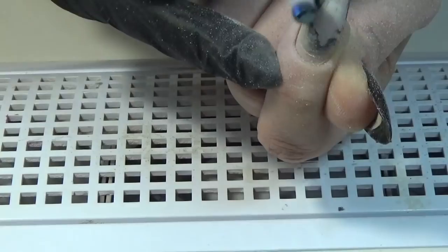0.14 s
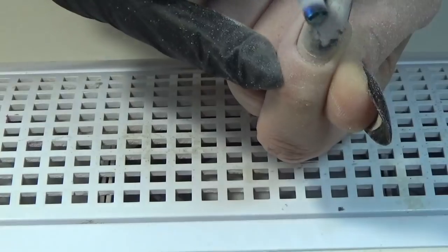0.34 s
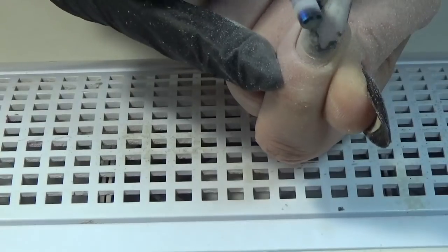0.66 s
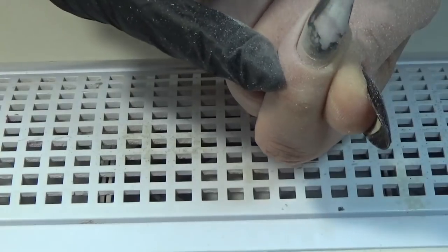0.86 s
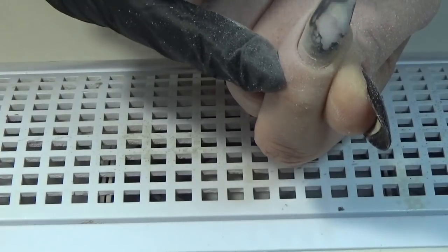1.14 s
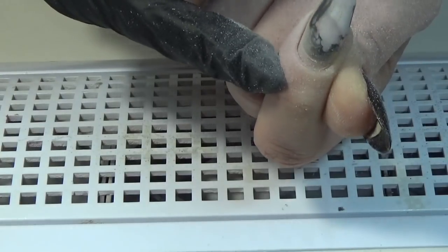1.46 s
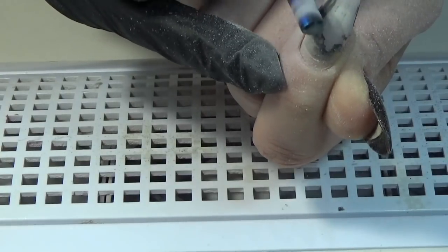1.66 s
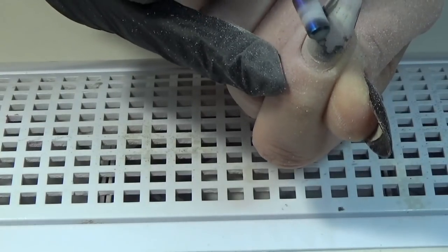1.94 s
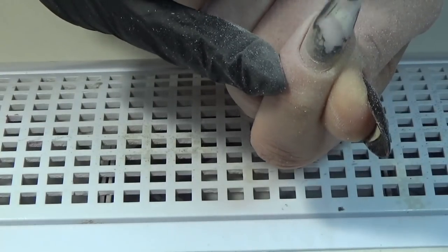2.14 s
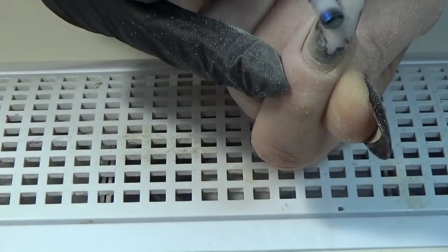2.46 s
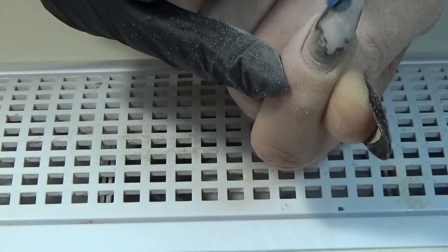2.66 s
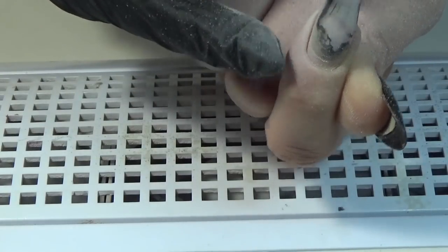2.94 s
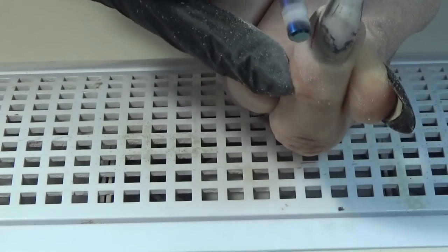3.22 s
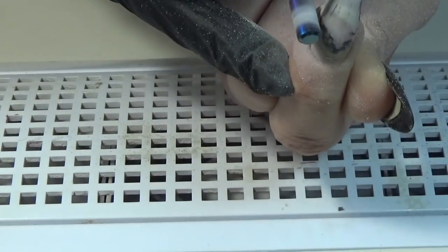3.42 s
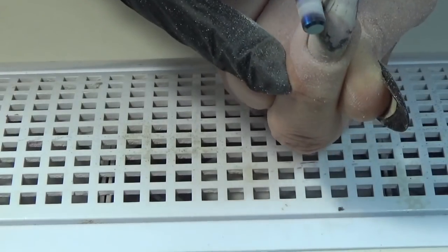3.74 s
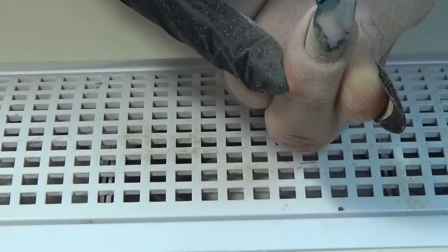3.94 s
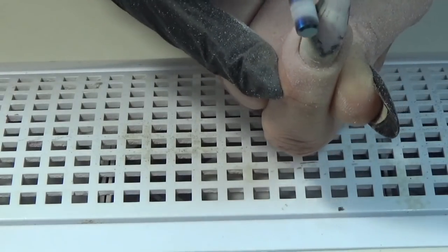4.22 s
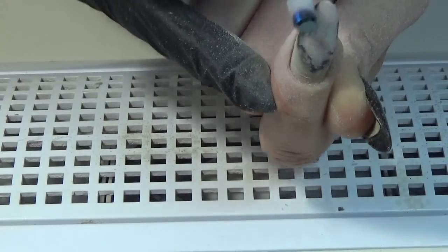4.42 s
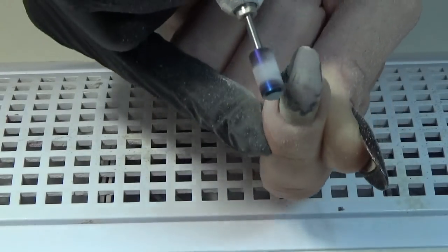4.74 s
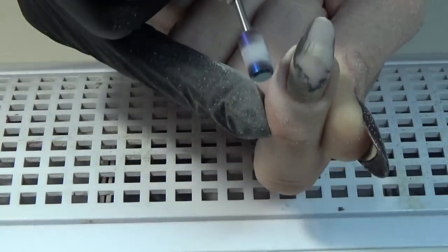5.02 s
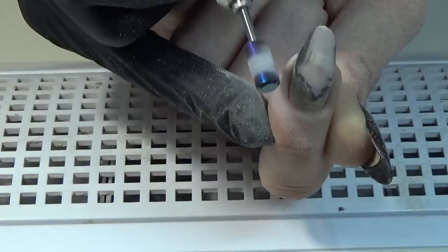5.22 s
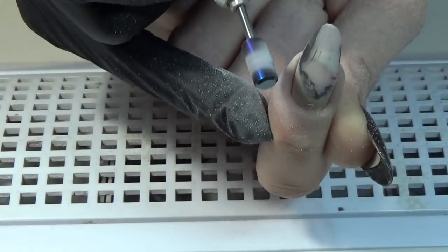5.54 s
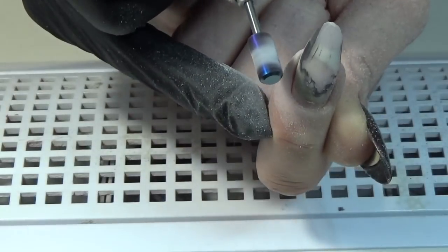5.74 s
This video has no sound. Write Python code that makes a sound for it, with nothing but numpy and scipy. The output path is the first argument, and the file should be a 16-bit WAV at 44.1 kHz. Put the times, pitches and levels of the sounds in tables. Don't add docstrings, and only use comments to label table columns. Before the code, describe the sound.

Close to a phone microphone at an indoor manicure table, a small electric nail drill sings a high, hissy whine. Short strokes on a fingernail sag its pitch slightly and add bright buzzes, grouped through the first three seconds. Later touches are lighter; at about 4.6 seconds the drill lifts clear and spins freely, slightly left. A dust extractor rushes steadily underneath.

```python
import sys
import numpy as np
from scipy import signal
from scipy.fft import rfft, irfft
from scipy.io import wavfile
from scipy.ndimage import uniform_filter1d

SR = 44100
rng = np.random.default_rng(int(sys.argv[2]) if len(sys.argv) > 2 else 0)


def makeup_ratio(level_db):
    decades = np.asarray(level_db, float) / 20
    return 10 ** decades


def transcribe(u):
    v = np.clip(np.atleast_2d(u).T, -1, 1)
    q = np.round(v * 32767).astype(np.int16)
    wavfile.write(sys.argv[1], SR, q)


N = 258867
TIME = np.arange(N) / SR
HZ = np.fft.rfftfreq(N, 1 / SR)

# f/Hz, side over mid level/dB
WIDTH = [(60, -12), (110, -18), (190, -18.5), (340, -17.5), (600, -11.5), (1060, -13), (1890, -14),
         (3350, -11), (5960, -15), (10600, -13)]
WHINE_SIDE_DB = -19.5

# f/Hz, density level/dB per Hz
FAN_AIR = [(18, -59), (30, -27), (70, -29.5), (136, -10.5), (209, -9.5), (321, 2), (425, -7.5), (552, -4),
           (606, -9), (758, -7.5), (1080, -6.5), (1380, -10), (1570, -1.5), (2080, -12.5), (2600, -9),
           (3380, -22.5), (5720, -120)]
FAN_DB = -31
# f/Hz, width/Hz, level/dB
FAN_MODES = [(348, 94, -5.5), (752, 54, 5), (1090, 210, 2), (1548, 290, -6.5)]
# f/Hz, rms level/dB
FAN_LINES = [(48.4, -69), (339.1, -44.5), (376.8, -51), (1550, -49), (1599, -57.5)]

# f/Hz, density level/dB per Hz
HISS = [(900, -24), (1600, -13), (2300, -11), (3500, -5), (5500, 0), (7000, -2.5), (8300, -3.5), (9200, -6),
        (11500, -9.5)]
# f/Hz, width/Hz, level/dB
OVER_NAIL = [(2730, 150, 8.5), (2938, 114, 9.5), (3227, 180, 6.5), (3830, 230, -0.5), (4370, 470, 5.5),
             (5630, 1000, 3), (7690, 560, 4), (8170, 300, 4)]
OVER_EDGE = [(2760, 250, 8), (2930, 76, 8.5), (3220, 260, 6), (4380, 430, 6.5), (5470, 640, 4),
             (6400, 300, 3.5), (6720, 230, 2.5), (7830, 760, 4.5), (10000, 1800, -1)]
LIFTED = [(1700, 100, 4.8), (2700, 520, 7.5), (3500, 180, 6), (4000, 200, 1.6), (4740, 250, 4.4),
          (5000, 370, 7.2), (6200, 330, 4), (7900, 500, 2), (8460, 200, 2.5)]
TILTED = [(2780, 510, 8.5), (3320, 270, 4.5), (4200, 500, 3.5), (5200, 310, 5.8), (6560, 340, 3),
          (7660, 590, 5.7)]
# t/s, hiss level/dB
HOLDS = [
    (-1, -20.5),
    (3, -20),
    (4.64, -19),
    (5.5, -18),
]
LIFT_S, TURN_S = 4.6, 0.14

FREE_HZ, START_HZ, RECOVER_S = 576.6, 547.3, 0.557
# middle t/s, length/s, braking/(Hz per s)
PASSES = [(-.048, .243, 132), (.432, .182, 158), (.813, .139, 147.5), (1.164, .138, 207.5),
          (1.451, .076, 148), (2.096, .245, 143), (2.55, .168, 131), (2.828, .058, 80), (3.81, .332, 97.5),
          (3.906, .159, 77.5), (4.32, .124, 150), (4.607, .189, 40)]

SLOT_DB, SLOT_AT_HZ, SLOT_DB_PER_HZ, SLOT_LIFTED_DB = -20, 553.4, 0.12, -21
# middle t/s, length/s, depth/dB
FADES = [(.55, .12, 1), (1.234, 0.088, 6), (1.53, 0.13, 1.5), (.15, .3, 0), (2.17, .1, 0.5),
         (2.4, 0.55, 1.5), (2.573, .05, 3), (2.83, .12, 4), (3.247, 0.043, 2), (4.585, 0.094, 20),
         (4.7, 0.14, 4), (4.99, .07, 2), (5.113, 0.25, 10), (5.72, 0.22, 9.5), (5.9, .14, 9)]
# order, level/dB over the nail, level/dB lifted
FAINT = [(2, -54, -54), (3, -52, -44), (4, -50, -46), (5, -46, -46), (6, -52, -48), (8, -44, -48),
         (9, -48, -38), (11, -47, -44), (12, -44, -46), (20, -43, -50)]
# order, level/dB over the nail, level/dB lifted, loss/dB per 100 Hz/s of braking
STEADY = [
    (14, -35.5, -36.5, 4),
    (13, -43, -41, -2),
    (7, -44.5, -38, -3),
    (1, -44.5, -43.5, 1),
]
WANDER_DB, WANDER_PER_S = 1.5, 7
# order, middle t/s, length/s, level/dB
SWELLS = [(14, 3.2, 0.18, -30), (14, 3.8, .25, -32), (14, 4.87, .1, -32), (14, 6.3, .3, -29.5),
          (13, 1.8, .3, -39), (13, 3.45, 0.7, -34), (13, 4.6, 0.25, -31), (13, 5.9, 0.32, -30),
          (7, 5.5, 0.55, -34), (7, 1.9, 0.082, -33), (7, 2.52, 0.12, -36), (18, 0.48, .06, -39),
          (20, 1.16, .07, -34), (19, 2.3, .06, -36), (1, .05, 0.36, -37.5), (1, 0.93, .7, -38.5),
          (1, 1.7, 0.4, -38), (1, 2.6, 1.04, -38), (1, 3.56, 0.26, -40), (1, 3.9, 0.078, -36),
          (1, 5.7, 0.42, -41), (12, 3.86, 0.13, -29), (20, 3.94, 0.087, -30), (12, 4.33, .13, -31),
          (8, 4.3, .08, -30), (19, 4.36, .06, -34), (20, 4.37, .08, -36)]

# middle t/s, length/s, buzz level/dB, brightest order
STROKES = [(.035, .078, -34, 12), (.4, .047, -30, 11.5), (.45, .041, -28.5, 13), (.5, .028, -34, 14),
           (.77, .039, -30, 11), (.815, .055, -30, 17), (1.1, .05, -32, 13), (1.145, .035, -28, 12),
           (1.195, .05, -32, 20), (1.42, .03, -30, 12), (1.455, .035, -29, 14), (1.99, .052, -31, 8),
           (2.05, .06, -32, 13), (2.1, .04, -26.5, 14), (2.14, .04, -31, 17.5), (2.19, .042, -34, 18),
           (2.49, .06, -32, 10), (2.55, .046, -26.5, 15), (2.61, .048, -33, 7), (2.83, .06, -30, 15)]
# order, level/dB
BUZZ = [(7, -1), (8, 1.5), (11, -2), (12, 3.5), (13, 2), (15, .5), (16, -2), (17, .5), (18, 1.5), (19, -4),
        (20, -4)]
FALL_DB_PER_ORDER, SHOULDER_DB, LUCK_DB = 1.6, 5, 1.6

# middle t/s, length/s, depth/dB
DUCKS = [(0.484, 0.12, 1.5), (0.83, 0.12, 2), (1.204, 0.17, 2), (1.453, .08, 2), (2.151, 0.14, 4),
         (2.582, 0.093, 3), (2.846, 0.06, 1.5), (3.925, 0.11, 0.5)]
TOP_HZ = 11030


def colour(points, modes=()):
    hz, db = np.transpose(points)
    bumps = sum(top_db * np.exp(-(2 * (HZ - f) / width) ** 2) for f, width, top_db in modes)
    return np.interp(np.log(HZ + 1), np.log(hz), db) + bumps


def walk(rate):
    hold = int(SR / rate)
    steps = np.repeat(rng.standard_normal(N // hold + 1), hold)
    return 1.24 * uniform_filter1d(uniform_filter1d(steps, hold), hold)[:N]


def swell(s, length):
    return np.exp(-(2 * (TIME - s) / length) ** 2)


def rise(s):
    return np.clip((TIME - s) / TURN_S + 0.5, 0, 1)


def rush(points, modes, db):
    mid, side = rfft(rng.standard_normal((2, N)))
    direct_db = colour(points, modes)
    mid = mid * makeup_ratio(direct_db)
    side = side * makeup_ratio(0.5 * direct_db + 0.3 * colour(points) + colour(WIDTH) + 0.3)
    return irfft(np.array([mid + side, mid - side]), N) * makeup_ratio(db) / np.std(irfft(mid, N))


def flicker(x, edges, slow_db, quick_db):
    spectrum = rfft(x)
    bands = (irfft(spectrum * ((HZ >= lo) & (HZ < hi)), N) for lo, hi in zip(edges, edges[1:]))
    return sum(makeup_ratio(slow_db * walk(2.86) + quick_db * walk(14)) * band for band in bands)


def extractor():
    air = rush(FAN_AIR, FAN_MODES, FAN_DB)
    air = flicker(air, np.geomspace(20, 4000, num=9), slow_db=0.13, quick_db=0.7)
    lines = 0
    for f, db in FAN_LINES:
        level = makeup_ratio(db + 1.6 * walk(4.89))
        lines = lines + level * np.sin(2 * np.pi * f * TIME + 0.76 * walk(4.12))
    return air + np.sqrt(2) * lines


def bearing_hiss(turns):
    begun = [rise(s) for s, _ in HOLDS] + [0]
    hiss = 0
    for here, after, (_, db), modes in zip(begun, begun[1:], HOLDS, (OVER_NAIL, OVER_EDGE, LIFTED, TILTED)):
        hiss = hiss + np.sqrt(here - after) * rush(HISS, modes, db)
    hiss = flicker(hiss, np.geomspace(800, 12000, num=13), slow_db=0.3, quick_db=0.8)
    hiss = hiss * makeup_ratio(0.5 * walk(40))
    return hiss * (1 + 0.08 * np.cos(2 * np.pi * turns))


def braking():
    return sum(brake * np.exp(-(2 * (TIME - s) / length) ** 4) for s, length, brake in PASSES)


def shaft_hz():
    lost = signal.lfilter([1 / SR], [1, -np.exp(-1 / SR / RECOVER_S)], braking())
    return FREE_HZ - lost - (FREE_HZ - START_HZ) * np.exp(-TIME / RECOVER_S)


def slot_db(speed):
    near_db = SLOT_DB + SLOT_DB_PER_HZ * (speed - SLOT_AT_HZ)
    fades_db = sum(depth_db * swell(s, length) for s, length, depth_db in FADES)
    return near_db + rise(LIFT_S) * (SLOT_LIFTED_DB - near_db) - fades_db


def contact(order, db):
    power = 0
    for (s, length, bite_db, brightest), luck in zip(STROKES, rng.standard_normal(len(STROKES))):
        fall_db = min(FALL_DB_PER_ORDER * abs(order - brightest), SHOULDER_DB)
        top_db = db + bite_db - fall_db + LUCK_DB * luck
        away = (TIME - s) / length
        power = power + makeup_ratio(2 * top_db) * np.exp(-(1.8 * away) ** 4 / 2 - away ** 2)
    return power


def sing(turns, order, power, flutter_db, rate):
    phase = 2 * np.pi * (order * turns + rng.random())
    level = np.sqrt(2 * power) * makeup_ratio(flutter_db * walk(rate))
    side = makeup_ratio(WHINE_SIDE_DB) * np.sin(phase + 2 * walk(2.99))
    return level * np.array([np.sin(phase) + side, np.sin(phase) - side])


def whine(speed, turns):
    power = {}
    for order, near_db, lifted_db, *_ in FAINT + STEADY:
        power[order] = makeup_ratio(2 * (near_db + rise(LIFT_S) * (lifted_db - near_db)))
    load = braking() / 100
    for order, *_, lost_db in STEADY:
        power[order] = power[order] * makeup_ratio(2 * (WANDER_DB * walk(WANDER_PER_S) - lost_db * load))
    for order, db in BUZZ:
        power[order] = power.get(order, 0) + contact(order, db)
    for order, s, length, db in SWELLS:
        power[order] = power[order] + makeup_ratio(2 * db) * swell(s, length)
    sound = sing(turns, order=10, power=makeup_ratio(2 * slot_db(speed)), flutter_db=1.5, rate=55)
    for order, p in power.items():
        sound = sound + sing(turns, order, p, flutter_db=0.8 + 0.07 * order, rate=40)
    return sound


def drill():
    speed = shaft_hz()
    turns = np.cumsum(speed * (1 + 0.00062 * walk(60))) / SR
    sound = whine(speed, turns) + bearing_hiss(turns)
    return sound * makeup_ratio(np.array([[0.45], [-0.45]]) * rise(LIFT_S))


def scene():
    return drill() + extractor()


def top_cut(x):
    return signal.sosfilt(signal.butter(12, 11190, fs=SR, output="sos"), x)


def record(dry):
    ducks_db = sum(depth_db * swell(s, length) for s, length, depth_db in DUCKS)
    ducked = dry * makeup_ratio(-ducks_db)
    mix = irfft(rfft(ducked) * (HZ < TOP_HZ), N)
    return top_cut(mix)


dry = scene()
out = record(dry)
transcribe(out)
```